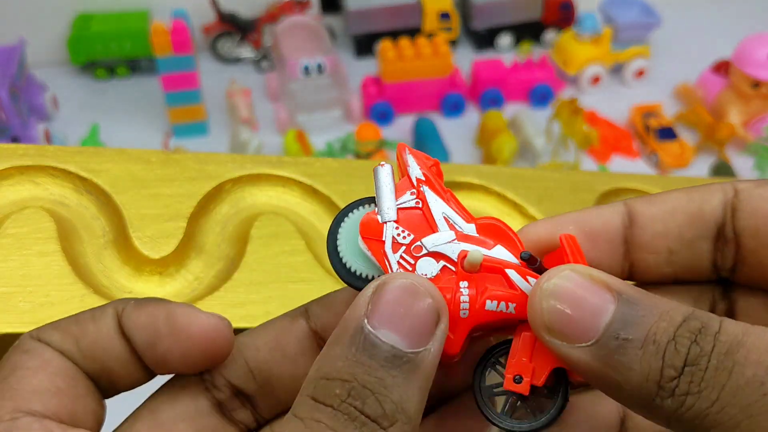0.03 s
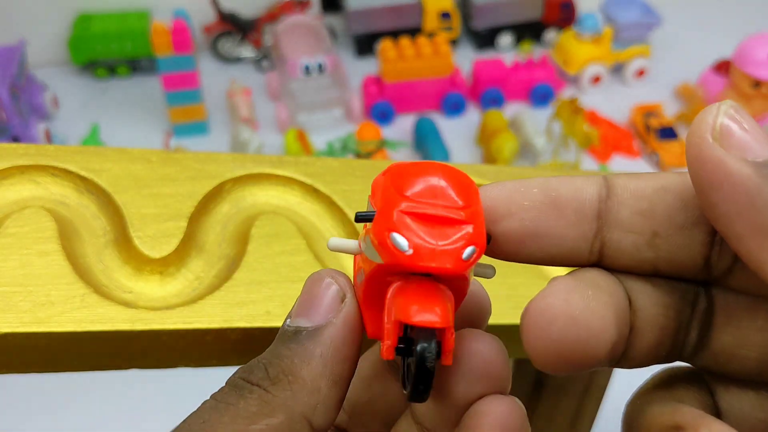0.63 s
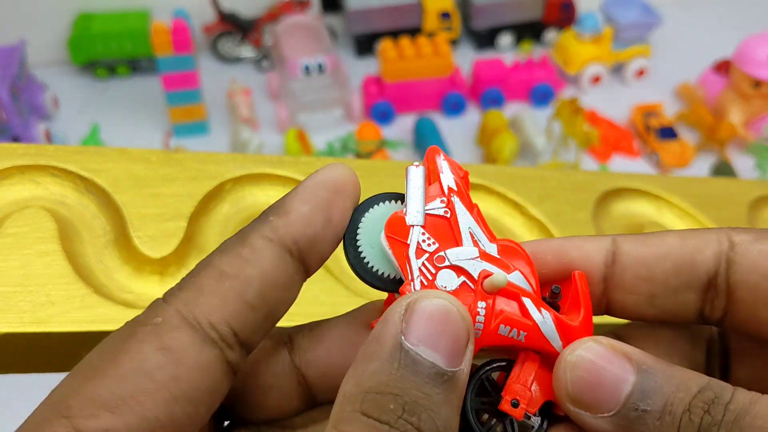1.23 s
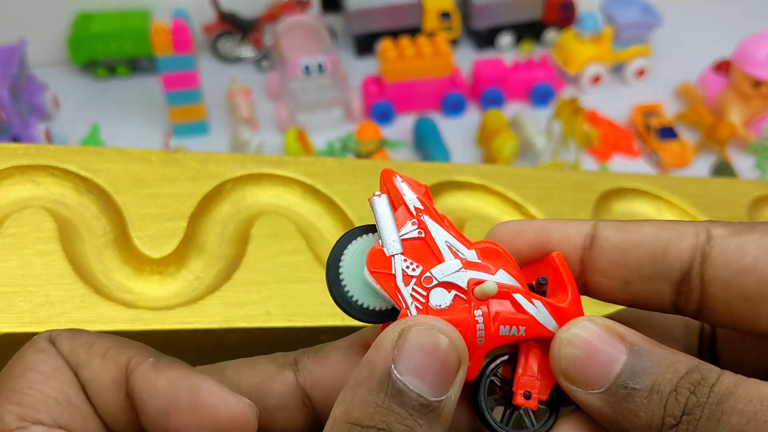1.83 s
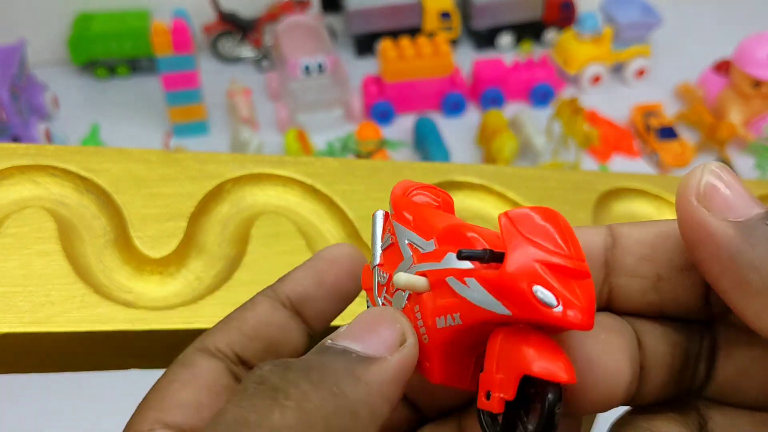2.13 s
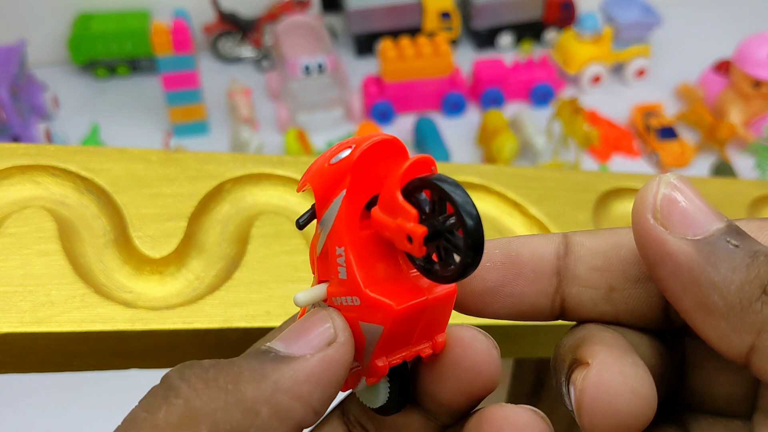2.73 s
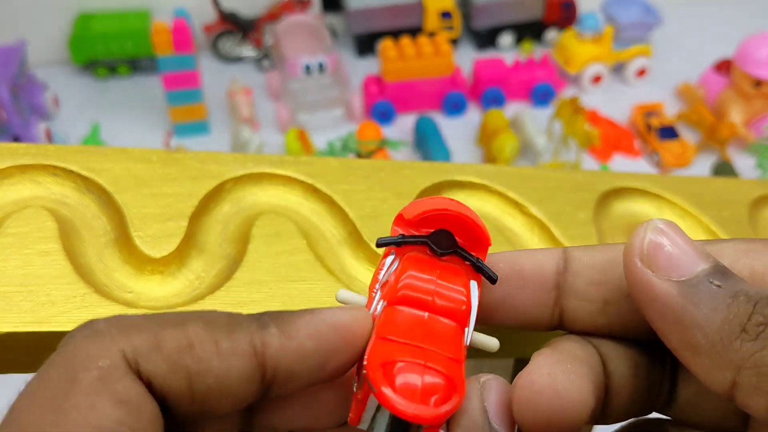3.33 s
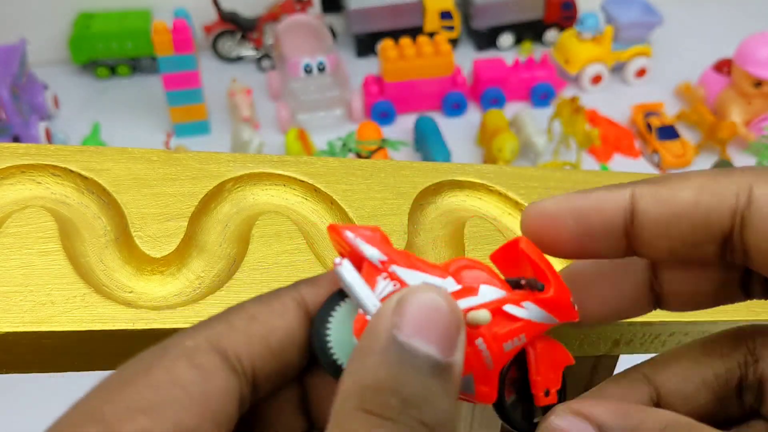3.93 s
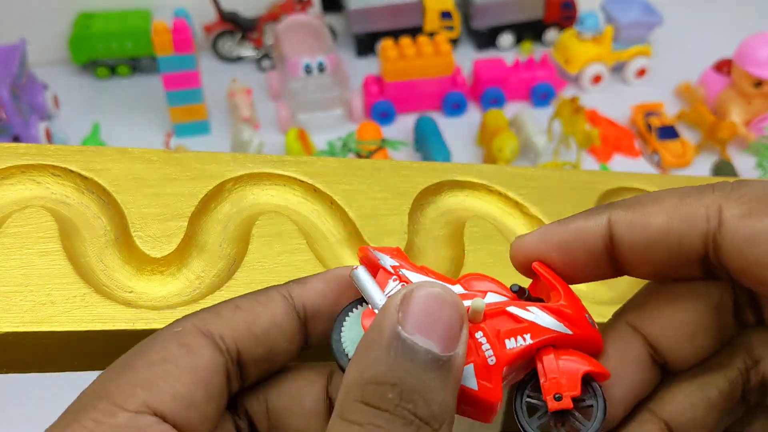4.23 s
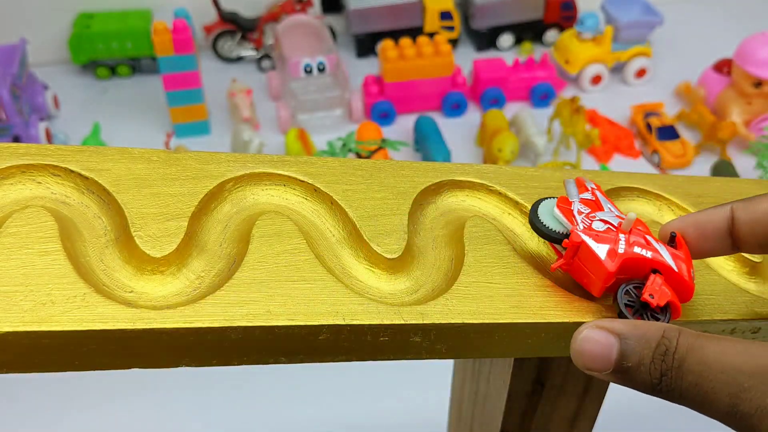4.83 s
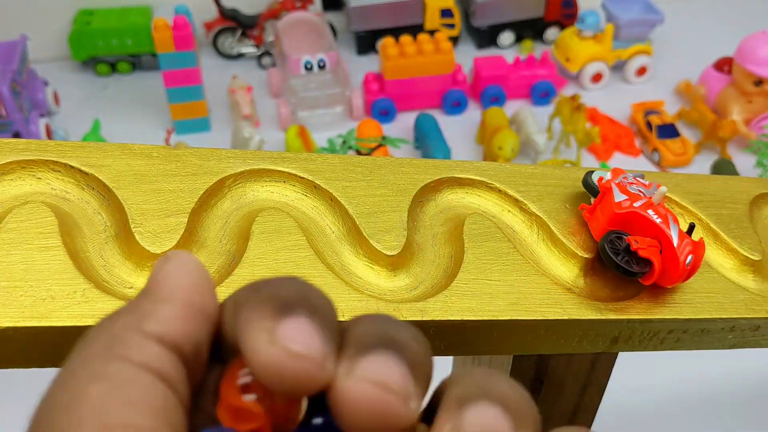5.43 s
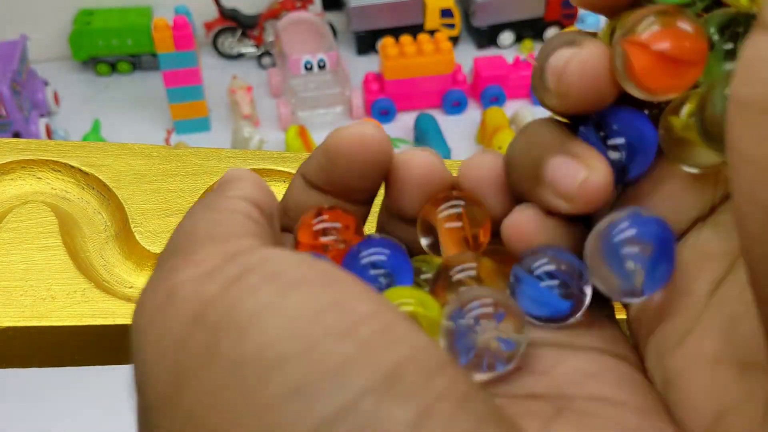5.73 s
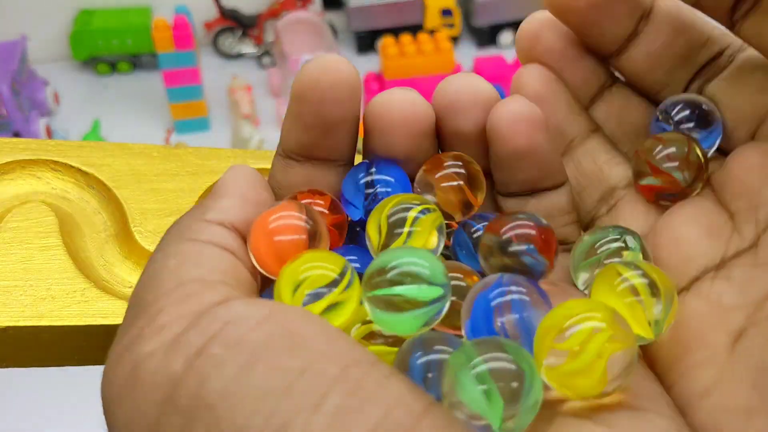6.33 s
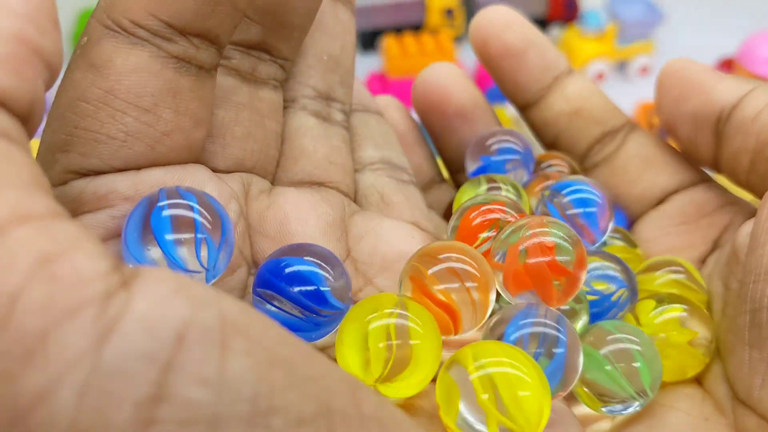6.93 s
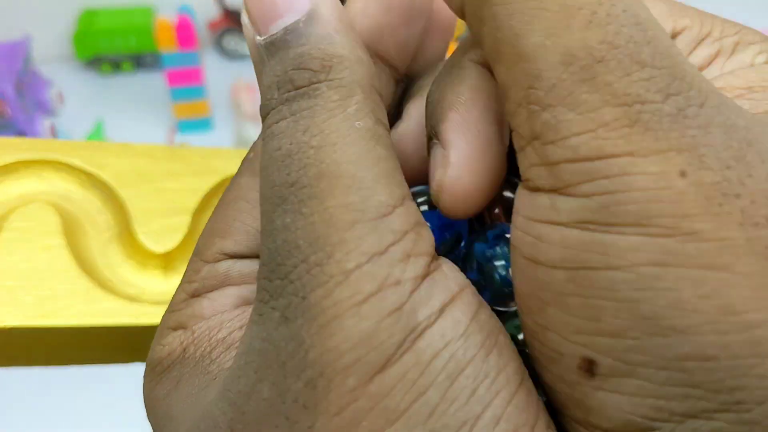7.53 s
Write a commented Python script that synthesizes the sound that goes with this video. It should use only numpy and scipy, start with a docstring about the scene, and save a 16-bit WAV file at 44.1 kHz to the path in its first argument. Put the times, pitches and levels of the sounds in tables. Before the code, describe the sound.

A toy motorbike's geared wheel spins with a dry plastic whirr, gives a brief second spin, then a faster, longer one that winds down amid small handling clicks. The toy is set on a wooden track with a sharp click, scrapes faintly and tips over. Then loud, bright glass marbles clack together in the hands, ending with a short hollow clack. Everything is close, in a small room with a low hum.

```python
"""A dry plastic whirr comes first: a finger flicks the wheel of a toy motorbike, close by in a small quiet
room, and gear teeth tick against the shell until friction or a finger slows them. Put on a wooden track,
the bike slides and topples, exciting the modes of the wood. Then glass marbles are poured from hand to
hand and shaken, each collision a brief bright clack, and the hollow of the closing hands resonates.
Under it all lie a fan-like hum and, near the end, a faint sinking tone."""
import sys
import numpy as np
from scipy import signal
from scipy.fft import rfft, irfft
from scipy.io import wavfile
from scipy.ndimage import uniform_filter1d

SR = 44100
rng = np.random.default_rng(int(sys.argv[2]) if len(sys.argv) > 2 else 0)


def output_pcm(signal):
    """Save a mono or channel-first signal as 16-bit PCM at the path in sys.argv[1].

    Samples are clipped to [-1, 1] before scaling.
    """
    pcm = np.clip(np.atleast_2d(signal).T, -1, 1) * 32767
    wavfile.write(sys.argv[1], SR, np.round(pcm).astype(np.int16))


N = 339570
TIME = np.arange(N) / SR
BINS = np.fft.rfftfreq(2048, 1 / SR)


def gear_whirr(teeth_per_turn=39, loose=0.85, uneven_db=3, fast_ring_db=6, wander_db=2):
    """Source and filter: meshing teeth and loose backlash ticks drive the resonances of the shell."""
    # shell response: (frequency [Hz], level [dB])
    spectrum = [(150, -21), (450, -22), (700, -19.5), (950, -22.5), (1250, -10.5), (1570, -17), (2350, -3),
                (2800, -4), (3700, -9.5), (5300, -10), (7500, -13), (9300, -8.5), (10800, -17.5),
                (14500, -14.5)]
    # shell resonances: (frequency [Hz], width [Hz], relative lift [dB])
    modes = [(2310, 110, 8), (2740, 120, 6), (4250, 400, 5), (6950, 500, 8), (8150, 300, 4)]
    # turning the bike uncovers its hollow underside or side panel: (time [s], underside [dB], panel [dB])
    grip = [(0, 7, 7.5), (1, 4, 6), (1.6, -10, 4.5), (2.1, 2, 13.5), (2.24, 8.5, 2), (2.6, 6, 1),
            (2.76, 18, 8), (2.86, 9, 9.5), (3.9, 11, 1)]
    speed, power = wheel()
    mesh_hz = teeth_per_turn * np.maximum(speed, 1)
    teeth = np.diff(np.floor(np.cumsum(mesh_hz) / SR), prepend=0)
    backlash = rng.random(N) < 2 * mesh_hz / SR
    train = (teeth + loose * backlash) * pulse_sizes(uneven_db)
    train *= np.sqrt(power * SR / mesh_hz / (1 + 2 * loose ** 2)) * gear_flutter()
    ticks = patter(train, snap_s=0.00043, scatter_db=-12.5, scatter_s=0.0041, likeness=0.54)
    hz, frames, spectra = signal.stft(ticks, SR, nperseg=512, noverlap=384)
    hz = hz[:, None]
    underside_db, panel_db = (np.interp(frames, TIME, lift) for lift in follow(grip))
    fast = np.clip((np.interp(frames, TIME, mesh_hz) - 450) / 200, 0, 1)
    shell_db = lifts([(1870, 230, underside_db), (3230, 430, panel_db)], hz)
    shell_db += read(spectrum, hz) + 1.16 * lifts(modes, hz)
    # when the gears run fast, the shell's ring near 7 kHz grows stronger and the whirr brightens
    shell_db += lifts([(6950, 620, fast_ring_db * fast)], hz)
    shell_db += 5 * fast * np.clip(np.log2((hz + 1) / 3000), 0, 1.5)
    shell_db -= 10 * np.log10(np.mean(amp(shell_db) ** 2, axis=0))
    # shifting fingers damp one resonance and free another
    wander = uniform_filter1d(rng.standard_normal(shell_db.shape), size=6, axis=0)
    wander = uniform_filter1d(wander, size=30, axis=1)
    shell_db += wander_db * wander / rms(wander)
    sound = signal.istft(spectra * amp(shell_db), SR, nperseg=512, noverlap=384)[1]
    return sound[:, :N] * pan(-2.5)


def wheel(friction_turns_per_s2=7.97, brake_s=0.053, surge_turns=0.12):
    """Constant friction slows a flywheel linearly. Returns speed [turns/s] and the gear noise power."""
    # (push [s], release [s], top speed [turns/s], stop [s], level at 10 turns/s [dB], surge [dB])
    spins = [(-.03, .058, 14.3, 1.07, -52.5, 4), (1.274, 1.333, 8.7, 1.44, -50, -1),
             (1.592, 1.706, 17.45, 3.9, -50.5, 4)]
    # brief rasps as the tyre rubs against a finger: (time [s], length [s], level [dB])
    rasps = [(0.121, 0.046, -42.5), (0.378, 0.015, -48), (1.621, 0.023, -43.5), (1.695, 0.033, -32.5),
             (1.83, 0.026, -37), (2.726, 0.017, -47), (2.761, 0.0071, -38)]
    speed, power = np.zeros(N), np.zeros(N)
    for push, release, top, stop, db, surge_db in spins:
        pushed = np.clip((TIME - push) / (release - push), 0, 1) ** 0.3  # most speed comes at once
        coasting = np.maximum(top - friction_turns_per_s2 * np.maximum(TIME - release, 0), 0)
        spin = pushed * coasting * np.exp(-np.maximum(TIME - stop, 0) / brake_s)
        turns = np.cumsum(spin) / SR
        turns -= np.interp(release, TIME, turns)
        # the wheel wobbles, so the gears rattle harder once a turn
        turn = np.round(turns).astype(int)
        heights = amp(surge_db + 1.5 * rng.standard_normal(64))[turn] * spin / 10
        surges = heights ** 2 * np.exp(-.5 * ((turns - turn) / surge_turns) ** 2)
        speed += spin
        power += (amp(db) * (spin / 10) ** 1.14) ** 2 * (1 + surges)
    for s, length, db in rasps:
        power += amp(db) ** 2 * np.exp(-2 * ((TIME - s) / length) ** 2)
    return speed, power


def gear_flutter(flicker_db=2.43, flicker_s=0.016, dip_at_s=3.1, dip_s=0.02, dip_db=-15):
    """Amplitude modulation: play in the gears varies the level; a fingertip briefly damps the shell."""
    flicker = np.interp(TIME / flicker_s, np.arange(N), rng.standard_normal(N))
    dip = np.exp(-.5 * ((TIME - dip_at_s) / dip_s) ** 2)
    return amp(flicker_db * flicker + dip_db * dip)


def bike_impacts():
    """Impulse response: handling makes the plastic click, and a flick sets the toy ringing."""
    # clicks: (time [s], level [dB], tilt [dB/octave], left minus right [dB], ring [Hz])
    hits = [(0.2056, -34, 20, -4, 2400), (1.2966, -40, 1, -3, 6850), (2.3361, -38.5, 4, 0, 13690),
            (2.4659, -33, 1, -2, 2178), (3.1497, -36.5, 9, -2, 15040), (3.2947, -48, -13, -2, 2430),
            (3.3371, -49, -4.5, -4.5, 2390), (3.3952, -44.5, -9, -1, 5950), (3.4358, -45.5, -6.5, -5, 2390),
            (3.5766, -43, -4.5, 2, 6300), (3.6544, -49, -6, -1, 6280), (3.6761, -54.5, -1.5, -5, 2300),
            (3.75, -57, 0, -3, 2900), (3.8198, -43, 5.5, 1, 5760), (3.842, -49, 2.5, -2, 6730),
            (4.115, -45.5, 5, -2, 8800), (4.2026, -57.5, -2, 0, 2270), (4.2657, -48, -5, 0.5, 7360),
            (4.7421, -21, 3.5, -3.5, 3450), (4.8294, -46, -3.5, -2, 3830), (4.866, -46.5, -3, -2, 4320),
            (5.1264, -42.5, -2, -1, 6960), (5.158, -31.5, -2.5, -6.5, 2320), (5.1657, -32, -9, -9.5, 1700),
            (5.172, -24.5, -1, 4, 8900), (5.1989, -36, 2, 1, 6600), (5.218, -38, -4, 2, 10700),
            (5.2432, -39, -6.5, -1, 3400)]
    # struck plastic: (frequency [Hz], level [dB])
    plastic = [(300, -30), (900, -19), (1600, -16), (2500, -1.5), (3300, -7.5), (4600, -6.5), (7000, -4),
               (9300, -3), (11000, -9.5), (15000, -3.5)]
    # shell resonances: (frequency [Hz], width [Hz], lift [dB])
    modes = [(2320, 350, 4), (2750, 300, 4), (3250, 350, 4), (6950, 600, 4)]
    out = clicks(hits, read(plastic, BINS) + lifts(modes, BINS), ring_db=13.5, ring_share=0.11,
                 snap_s=0.0022, scatter_db=-12.5, scatter_s=0.014, likeness=0.4)
    add(out, 1.712, amp(-44.5) * ring([(117, -3, 0.13), (147, -2, 0.064)]))  # finger slips off the tyre
    frame = ring([(707, -1, 0.092), (1220, 3, 0.067), (1320, 12, 0.034)])
    add(out, 1.690, amp(-49) * frame)  # the push rings the frame
    return out


def track_knocks():
    """Modal vibration: each blow on the wooden track excites a low thud and a higher knock."""
    # blows: (time [s], thud gain [dB], knock gain [dB])
    blows = [(4.743, -50, -68), (4.825, -52.5, -56), (4.97, -57.5, -62), (5.154, -54.5, -35),
             (5.179, -46.5, -45), (5.207, -72, -39.5), (5.243, -51.5, -46)]
    # low modes of the track: (frequency [Hz], relative level [dB], T60 [s])
    thud_modes = [(86, -7, 0.2), (105.8, -0.5, 0.43), (178.6, 5, 0.26), (216, 0, 0.12), (286, -2, 0.11)]
    # high modes: (frequency [Hz], relative level [dB], T60 [s])
    knock_modes = [(498, -15, 0.09), (652.4, -7, 0.15), (704, -8.5, 0.29), (1034, 4.5, 0.051),
                   (1127, 3.5, 0.037), (1397, 2, 0.036), (1850, 5.5, 0.026), (2300, 3, 0.014),
                   (2900, 12.5, 0.021), (3400, 11, 0.02)]
    out = np.zeros((2, N))
    for s, thud_db, knock_db in blows:
        add(out, s, amp(thud_db) * ring(thud_modes) + amp(knock_db) * ring(knock_modes))
    return out


def track_slide(catches_per_s=1500):
    """Sliding friction: plastic and tyre catch at random on the grain of the wood."""
    # course of the slide: (time [s], level [dB])
    course = [(4.6, -82), (4.67, -68), (4.76, -65), (4.84, -58.5), (4.9, -63), (4.97, -59.5), (5.05, -70),
              (5.15, -57), (5.3, -69)]
    # rubbed wood: (frequency [Hz], level [dB])
    spectrum = [(400, -10), (690, -2), (900, -13), (1700, -16), (2300, 0), (2800, -12), (3600, -1.5),
                (4400, -5), (5200, -21), (6900, -6), (8000, -20), (15000, -21)]
    train = (rng.random(N) < catches_per_s / SR) * np.sqrt(SR / catches_per_s)
    train *= amp(follow(course)[0]) * during(course)
    catches = patter(train, count=4, snap_s=0.0006, scatter_db=-1, scatter_s=0.0073, likeness=0.18)
    return colour(catches, read(spectrum, BINS))


def marbles(contacts_per_s=380):
    """Elastic collision: glass meets glass so briefly that it sounds bright; the palms damp long rings."""
    # loud clacks: (time [s], relative level [dB], tilt [dB/octave], left minus right [dB], ring [Hz])
    hits = [(5.5674, -31, -4.5, 2, 4590), (5.588, -21, 0, -2, 6640), (5.6015, -36, -11, 0.5, 3170),
            (5.686, -15.5, 4, -2, 7020), (5.7184, -34, -6, -9, 5830), (5.7244, -26, -0.5, 2.5, 7100),
            (5.7652, -38, -9, -3, 6560), (5.8136, -11, 0, -2, 13100), (5.8833, -13, 2.5, -3.5, 12000),
            (5.8995, -13.5, 4, -8, 4480), (5.9009, -7.5, 3.5, -3, 7050), (5.9423, -16, 1, 1.0, 8500),
            (5.9579, -10.5, 1, 0, 6560), (5.9833, -10.5, 6, 4, 7200), (6.0028, -10, 3, -3, 6500),
            (6.0125, -7, -0.5, -3, 12400), (6.0483, -5, -0.5, -1, 14800), (6.075, -7, 2, 0.5, 4400),
            (6.1035, -16, 11, -3, 7140), (6.1355, -37, 1, -4.5, 7180), (6.1368, -4, 5, -3, 6800),
            (6.1574, -8, 7, -4, 6580), (6.1928, -8, 3.5, -5, 6600), (6.2216, -11, 4, -3, 6360),
            (6.254, -14.5, 1, -8, 7900), (6.2984, -17, -1, -5.5, 6000), (6.3049, -10, 2, -4.0, 9190),
            (6.3572, -7.5, -1.5, -3, 6100), (6.3643, -8.5, -1, 3.5, 6450), (6.3999, -11.5, 1, -2, 6540),
            (6.4154, -21.5, -0.5, 3, 7000), (6.4687, -40, -5, 0.5, 6700), (6.5212, -19, -2, -3, 6580),
            (6.539, -15.5, 1, -3, 7460), (6.5482, -11.5, 5, -2, 8113), (6.5648, -12.5, 1, 2, 6450),
            (6.589, -15.5, 3, -8.5, 8000), (6.6287, -11.5, -0.5, -6, 6700), (6.6429, -9, -1, -2, 9300),
            (6.6581, -6.5, -1, 2, 8000), (6.7011, -7.5, 3, 0.0, 13500), (6.7149, -5, -1, 0.0, 13200),
            (6.7391, -11, 1.5, 8.5, 13700), (6.7604, -5.5, 5, -3, 6550), (6.7652, -9.5, -6.5, 4.5, 7000),
            (6.8002, -4.5, 0, -2.5, 7000), (6.8188, -9.5, -4, -6, 6950), (6.824, -7, 2, 3, 7600),
            (6.8353, -9, 4, -1.0, 6980), (6.8457, -5, -1, 2, 9600), (6.8653, -11.5, 6, -1.0, 8270),
            (6.8843, -11, 1, -4, 6880), (6.9037, -11.5, 7, -1.0, 7060), (6.9168, -8.5, 1, 0.0, 7460),
            (6.9307, -8, 0.5, 9, 7400), (6.938, -10, 2.5, 1, 7050), (6.9634, -20, -2, 6, 7090),
            (7.0383, -15, 2, -1.5, 6300), (7.0554, -15, -2, -2, 6500), (7.0886, -12.5, 3, -5, 6160),
            (7.1147, -18.5, 5, -1, 11600), (7.1284, -22.5, 0.5, -2, 7000), (7.1578, -36.5, -12, 0, 6400),
            (7.21, -23, 1.5, -6, 8400), (7.2321, -16, 3.5, -4.0, 7890), (7.2519, -13.5, 3, -2, 7650),
            (7.2634, -16, 3.5, -8, 7100), (7.2789, -6, 9.5, -1, 9800), (7.3243, -18, 10, -3, 8560),
            (7.349, -15, 8, -4, 12000), (7.374, -9, 1, -4, 7200), (7.4102, -10.5, -3, -2, 7500),
            (7.431, -8, 1, -1, 8050), (7.448, -15, -1, 8, 8340), (7.4627, -5.5, 1, 5, 6660),
            (7.5499, -16.5, -4.5, -3.0, 7140), (7.5913, -12, -1.5, -6, 7150), (7.6151, -4, -3, -2.5, 7050),
            (7.6263, -11, -6.5, 3, 8770), (7.6634, -25, 1, -0.5, 6960)]
    # colliding glass: (frequency [Hz], level [dB])
    glass = [(250, -44), (600, -41), (900, -28.5), (1300, -20.5), (1750, -21.5), (2400, -12), (2900, -8.5),
             (4200, -5), (5500, -4.5), (6900, -2), (8800, -0.5), (10700, -6), (13000, -7), (15600, -6.5)]
    glass_db = read(glass, BINS) + lifts([(7000, 270, 3)], BINS)
    train = pulse_sizes(3) * (rng.random(N) < contacts_per_s / SR) * np.sqrt(SR / contacts_per_s)
    heap = patter(train * jostle(), count=24, snap_s=.0004, scatter_db=-17, scatter_s=.004, likeness=.4)
    clacks = clicks(hits, glass_db, ring_db=9, ring_share=.1,
                    snap_s=.0005, scatter_db=-13, scatter_s=.007, likeness=.3)
    return amp(-3) * colour(heap, glass_db) * pan(-1) + amp(-6) * clacks


def jostle(shifting_db=-55, first_db=-9.5, stir_s=.003, settle_s=.01):
    """Envelope of a granular flow: each tumble of the heap swells, fades ever faster and settles."""
    # (start [s], peak [s], rest [s], relative peak level [dB], last contacts against the peak [dB])
    tumbles = [(5.816, 5.821, 5.84, -26, -14), (5.899, 5.908, 5.92, -23, -12),
               (5.96, 6.135, 6.315, -20.5, -10), (6.359, 6.366, 6.415, -28.5, -10),
               (6.529, 6.82, 7.005, -22, -13), (7.041, 7.091, 7.13, -32.5, -5),
               (7.257, 7.43, 7.5, -16.5, -16), (7.604, 7.622, 7.685, -18.5, -20)]
    strength = amp(shifting_db) * (TIME > tumbles[0][0])
    for start, peak, rest, db, last_db in tumbles:
        swell_db = np.interp(TIME, [start, peak], [first_db, 0])
        fade_db = last_db * np.interp(TIME, [peak, rest], [0, 1]) ** 2.77
        moving = np.exp(-np.maximum(start - TIME, 0) / stir_s - np.maximum(TIME - rest, 0) / settle_s)
        strength += amp(db + swell_db + fade_db) * moving
    return strength


def cupped_hands(t60_s=.04):
    """Cavity resonance: the hollow between the closing hands rings briefly."""
    # rings of the hollow: (time [s], frequency [Hz], level [dB])
    hollow = [(7.593, 1400, -41), (7.614, 1374, -24), (7.62, 1540, -27)]
    out = np.zeros((2, N))
    for s, hz, db in hollow:
        add(out, s, ring([(hz, db, t60_s)]))
    return out


def far_tone(waver_hz=20):
    """Frequency modulation: a faint distant tone wavers at random as it sinks."""
    # path of the tone: (time [s], frequency [Hz], level [dB])
    glide = [(7.1, 500, -90), (7.19, 477, -66), (7.27, 457, -68), (7.37, 454, -65), (7.45, 425, -88)]
    hz, db = follow(glide)
    waver = uniform_filter1d(rng.standard_normal(N), size=500)
    phase = 2 * np.pi * np.cumsum(hz + waver_hz * waver / rms(waver)) / SR
    return amp(db) * during(glide) * np.sin(phase)


def reverberation(x, wet_db=-13, build_s=0.0069):
    """Diffuse reflections decay exponentially, soonest in the high treble."""
    # decay of the room: (frequency [Hz], T60 [s])
    decay = [(200, 0.16), (1500, 0.22), (6000, 0.17), (15000, 0.082)]
    hz, t, spectra = signal.stft(rng.standard_normal((2, SR // 2)), SR, nperseg=256)
    tail = signal.istft(spectra * amp(-60 * t / read(decay, hz)[:, None]), SR)[1]
    tail *= 1 - np.exp(-np.arange(tail.shape[1]) / SR / build_s)
    return amp(wet_db) * signal.fftconvolve(x, tail / np.linalg.norm(tail[0]), axes=1)[:, :N]


def background(base_db=-62.5, rumble_hz=130):
    """Partly coherent noise, nearly mono in the bass; spectral peaks give a fan-like hum."""
    # noise floor: (frequency [Hz], relative level [dB])
    spectrum = [(20, -45), (35, -14), (55, -2), (85, -5.5), (140, -16), (200, -2), (280, -19), (450, -15.5),
                (780, -12), (1250, -12.5), (1650, -19.5), (4000, -25.5), (10800, -31.5), (15000, -28.5)]
    # hum peaks: (frequency [Hz], width [Hz], lift [dB])
    hum = [(78, 19, 8.5), (201.9, 9.3, 9), (681, 25, 9)]
    # likeness of left and right: (frequency [Hz], correlation [1])
    coherence = [(60, 0.92), (180, 0.97), (550, 0.48), (1650, -0.11), (4970, -0.05), (15000, -0.35)]
    # the background starts louder and settles; its bass drops as the marbles begin:
    # (time [s], gain above the rumble [dB], rumble gain [dB])
    gains = [(0, 8, 5.5), (.6, 3, 1), (2.3, 1, -2), (3, 1, 0.5), (5.7, 0.5, 0), (6, -2, -3), (7.7, 1.5, -6)]
    hz = np.fft.rfftfreq(N, 1 / SR)
    spectra = stereo_spectra(N, np.clip(read(coherence, hz), 0, 1))
    spectra *= amp(read(spectrum, hz) + lifts(hum, hz))
    noise, rumble = irfft(spectra, N), irfft(spectra * (hz < rumble_hz), N)
    upper_db, rumble_db = follow(gains)
    shaped = (noise - rumble) * amp(upper_db) + rumble * amp(rumble_db)
    return amp(base_db) * shaped / rms(noise) * pan(-1)


def contact(snap_s, scatter_db, scatter_s, likeness, size=2048):
    """Impact and scattering: a noise snap, then a tail scattered by hands and track."""
    t, hz = np.arange(size) / SR, np.fft.rfftfreq(size, 1 / SR)
    coherence = likeness ** (hz / 7000)  # long waves reach both sides alike
    noise = irfft(stereo_spectra(size, coherence), size)
    decay = np.exp(-t / snap_s) + amp(scatter_db) * np.exp(-t / scatter_s)
    return noise * decay * (1 - np.exp(-t / 0.00031))


def clicks(rows, body_db, ring_db, ring_share, **shape):
    """Resonant filtering: the struck body colours each contact and gives it a brief ring."""
    out = np.zeros((2, N))
    octaves = np.clip(np.log2((BINS + 1) / 6500), -1, 1)
    for s, db, tilt, side_db, hz in rows:
        tint_db = body_db + tilt * octaves + lifts([(hz, ring_share * hz, ring_db)], BINS)
        click = colour(contact(**shape), tint_db)
        add(out, s, click / rms(click[:, :66]) * amp(db) * pan(side_db))  # level of the first 1.5 ms
    return out


def patter(train, count=12, **shape):
    """Convolution: each pulse sets off one of several contacts of unit energy."""
    which, out = rng.integers(0, count, N), np.zeros((2, N))
    for k in range(count):
        hit = contact(**shape)
        hit /= np.linalg.norm(hit[0])
        out += signal.oaconvolve((train * (which == k))[None], hit, axes=1)[:, :N]
    return out


def ring(modes):
    """Damped modes (frequency [Hz], level [dB], T60 [s]), a little out of phase left and right."""
    t, waves = np.arange(SR // 2) / SR, 0
    for hz, db, t60 in modes:
        phase = min(hz / 1500, 1) * rng.standard_normal((2, 1))
        waves += amp(db - 60 * t / t60) * np.sin(2 * np.pi * hz * t + phase)
    return waves * (1 - np.exp(-t / 0.0015))


def colour(x, db):
    """Minimum-phase filter of unit energy, shaped by db on BINS."""
    log_gain = np.log(amp(np.maximum(db, db.max() - 70)))
    mirrored = np.r_[log_gain, log_gain[-2:0:-1]]
    taps = np.fft.ifft(np.exp(np.conj(signal.hilbert(mirrored)))).real[:len(BINS)]
    return signal.oaconvolve(x, taps[None] / np.linalg.norm(taps), axes=1)[:, :x.shape[1]]


def stereo_spectra(size, coherence):
    """Two white noise spectra with the given correlation."""
    a, b = rfft(rng.standard_normal((2, size)))
    return np.array([a, coherence * a + np.sqrt(1 - coherence ** 2) * b])


def pulse_sizes(spread_db):
    """Clipped log-normal strengths of unit power."""
    sizes = amp(spread_db * np.clip(rng.standard_normal(N), -2, 1.5))
    return sizes / rms(sizes)


def off_centre(x, lag=7):
    """Path difference: sound from the right reaches the left side lag samples late."""
    return np.array([np.r_[np.zeros(lag), x[0, :-lag]], x[1]])


def pan(db):
    """Gains for a level difference, left minus right."""
    return amp([[db / 2], [-db / 2]])


def lifts(modes, hz):
    """Lorentzian resonance peaks in dB."""
    return sum(db / (1 + (2 * (hz - f) / width) ** 2) for f, width, db in modes)


def read(points, hz):
    """A spectrum table on a log-frequency axis."""
    f, value = np.transpose(points)
    return np.interp(np.log(hz + 1), np.log(f + 1), value)


def follow(rows):
    """Each column of a time curve at every sample."""
    s, *columns = np.transpose(rows)
    return [np.interp(TIME, s, column) for column in columns]


def during(rows):
    """1 within the span of a time curve, 0 outside."""
    return (TIME >= rows[0][0]) & (TIME <= rows[-1][0])


def add(mix, s, sound):
    """Superposes a stereo sound at time s."""
    part = mix[:, round(s * SR):][:, :sound.shape[-1]]
    part += sound[..., :part.shape[1]]


def amp(db):
    """Decibels to gain."""
    return 10 ** (np.asarray(db) / 20)


def rms(x):
    """Root mean square."""
    return np.sqrt(np.mean(x ** 2) + 1e-20)


def scene():
    """Superposition of direct sound, reverberation and background noise."""
    bike = gear_whirr() + track_slide() + bike_impacts() + track_knocks()
    direct = off_centre(bike + marbles() + cupped_hands()) + far_tone()
    return direct + reverberation(direct) + background()


def record(dry, edge_hz=15950):
    """Band limiting: a linear-phase low-pass removes the highest treble."""
    taps = signal.firwin(255, edge_hz, window=("kaiser", 8), fs=SR)
    return signal.oaconvolve(dry, taps[None], "same", axes=1)


dry = scene()
out = record(dry)
output_pcm(out)
```